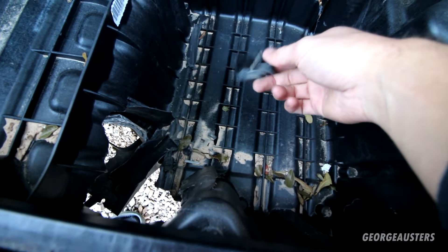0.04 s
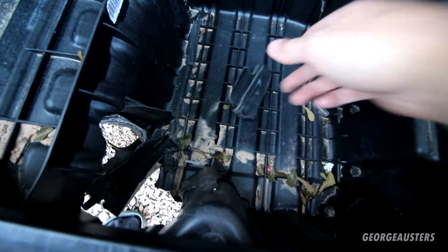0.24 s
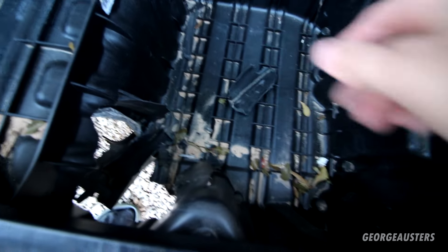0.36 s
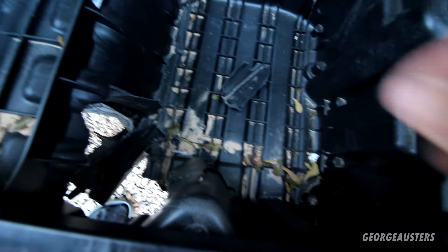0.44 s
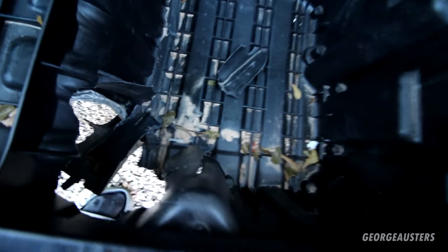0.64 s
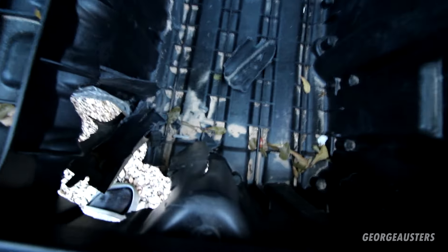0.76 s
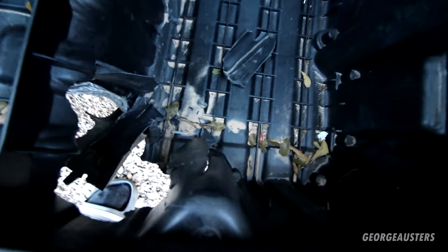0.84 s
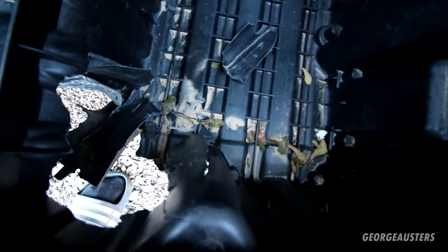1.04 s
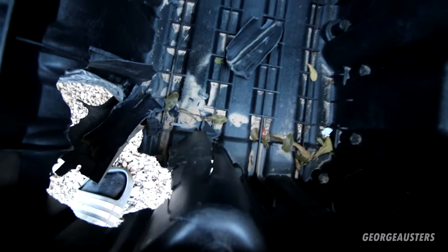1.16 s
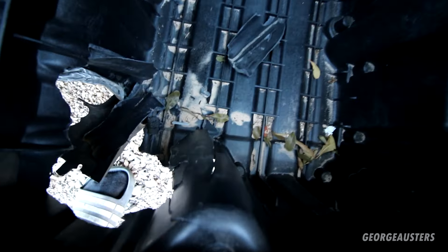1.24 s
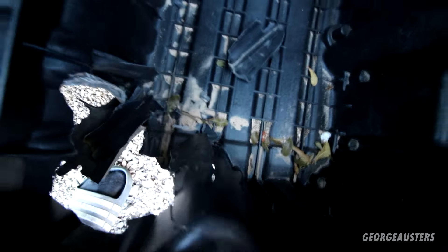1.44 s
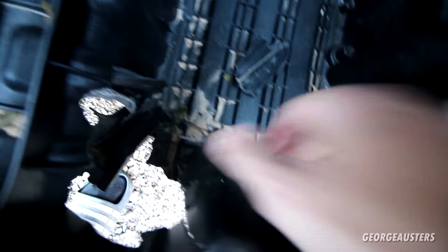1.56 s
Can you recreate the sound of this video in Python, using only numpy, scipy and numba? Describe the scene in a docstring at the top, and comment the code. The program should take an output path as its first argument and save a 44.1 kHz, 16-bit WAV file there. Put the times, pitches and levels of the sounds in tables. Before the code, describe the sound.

Close up, a broken plastic shard lands with a sharp hollow knock, bounces and rocks in a fast fading clatter, then lies still over quiet outdoor air and faint motor hum, before a soft rustling bump.

```python
"""A broken plastic piece is dropped on a ribbed plastic car boot floor, bounces and rocks to rest.
Each contact excites damped modes of the hollow floor panel; rattling noise bursts and modes clack the piece.
Finger friction whispers at resonances before the fall, and a sleeve rustles as level-shaped noise.
A far motor hums as a gliding sine over outdoor air of flickering noise bands.
Gain control at the close microphone ducks the background after loud hits; strong peaks are clipped."""
import sys
import numpy as np
from scipy import signal
from scipy.io import wavfile
from scipy.ndimage import uniform_filter1d
from numba import njit

SR = 44100
rng = np.random.default_rng(int(sys.argv[2]) if len(sys.argv) > 2 else 0)


def convert_level_to_amplitude(level_db):
    """Map a level in decibels to its linear amplitude factor."""
    exponent = np.asarray(level_db, float) / 20
    return 10 ** exponent


def materialize(psi):
    """Save the field psi as 16-bit PCM at rate SR to the path in sys.argv[1].

    A 1-D psi becomes a single channel; in a 2-D psi each row is a channel.
    """
    bounded = np.clip(np.atleast_2d(psi).T, -1, 1)
    quanta = np.round(bounded * 32767).astype(np.int16)
    wavfile.write(sys.argv[1], SR, quanta)


N = 70560  # samples, 1.6 s

# contacts on the floor panel; the piece lying on it shifts and damps the ring:
# (time [s], level [dB], main pitch [Hz], main t60 [s], low modes [dB], upper body [dB])
PANEL_CONTACTS = [(0.2293, 15, 414.5, 0.038, -8, -13.5), (0.254, -17, 414, 0.048, 9.5, -30),
                  (0.266, -10.5, 420, 0.095, -15, -24), (0.2875, -18, 434, 0.14, 5, -28),
                  (0.3342, -5.5, 407, 0.051, 0.5, -4.5), (0.353, 4.5, 416, 0.027, -33, -9.5),
                  (0.363, -4, 435.6, 0.051, -33, -16), (0.375, -10, 460, 0.065, 3.5, -13),
                  (0.398, -25, 394, 0.28, -10, -11), (0.418, -18.5, 420, 0.039, 0, -3),
                  (0.462, -10, 417, 0.065, -23, 1), (0.469, -10, 390, 0.041, -43, -7),
                  (0.479, 2, 444, 0.06, -1, -7), (0.518, -5, 445.7, 0.089, -6, -15),
                  (0.53, -6, 431, 0.041, -15, -4), (0.539, -13, 391, 0.062, -3, -35),
                  (0.56, -19, 450, 0.22, 9.5, -19), (0.5846, -4, 442, 0.043, -25, -6.5),
                  (0.596, -18, 460, 0.23, 12, -14), (0.603, -24, 430, 0.029, -19, -6),
                  (0.623, -4, 424.5, 0.078, -2.5, -9), (0.654, -13.5, 480, 0.083, 4, -7),
                  (0.668, -14.5, 422.6, 0.12, -24, -18), (0.683, -10.5, 424, 0.052, -4.5, -13),
                  (0.708, -29.5, 422, 0.094, 11, -12), (.728, -30.5, 420.5, 0.063, 10.5, -13),
                  (0.75, -38, 438, 0.059, -9, 5)]
# modes of the floor panel: (frequency [Hz], level [dB], t60 [s]);
# each contact scales the pitch and decay of the main group from MAIN_HZ and MAIN_T60_S
LOW_MODES = [(119, -12, 0.112), (169.7, -4, 0.071), (236, -13, 0.072), (257.6, -6, 0.078), (300, 4, 0.047)]
MAIN_MODES = [(364.5, 5, 0.026), (401.6, -3, 0.054), (433.7, 6.5, 0.089), (451, -15, 0.041)]
UPPER_MODES = [(640, 0.5, 0.013), (823, -7, 0.07), (942, 4, 0.027), (980, -9, 0.013), (1172, -8.5, 0.065),
               (1310, -31, 0.0083), (1570, -6, 0.0096), (1730, -2, 0.025)]
# first a low push that comes with the overloaded first hit, then thuds of the piece settling, then a hand:
# (time [s], level [dB], frequency [Hz], t60 [s])
PUSH_AND_THUDS = [(0.2299, 6.5, 58.5, 0.034), (.763, -21, 300, 0.1), (1.416, -15, 300, 0.018),
                  (1.425, -16.5, 270, 0.042), (1.448, -25, 419.5, 0.065), (1.495, -25, 237, 0.053),
                  (1.506, -24, 156, 0.14), (1.516, -28, 253, 0.076), (1.545, -30, 150, 0.071)]
# clacks of the loose piece: (time [s], level [dB], treble rattle change [dB], rattle t60 [s])
PIECE_CLACKS = [(0.2299, 5, -26, 0.0066), (0.3335, -14, 10.5, 0.065), (0.3515, 7.5, 6.5, 0.025),
                (0.3636, -1.5, 14.5, 0.046), (0.3762, -4, -25, 0.019), (0.42, -18.5, -28, 0.1),
                (0.4354, -48, -10, 0.079), (0.461, -11.5, -14, 0.071), (0.4635, -18.5, -18, 0.039),
                (0.4695, -19.5, -28, 0.071), (0.479, -15.5, -16, 0.036), (0.489, -0.5, 13, 0.022),
                (0.5, -15, -24, 0.0095), (0.5181, -18.5, -28, 0.048), (0.527, -22, -50, 0.056),
                (0.538, -37, -19, 0.032), (0.5835, -23, -32, 0.11), (0.5954, -43, -29, 0.27),
                (0.621, -28, -14, 0.12), (0.647, -27, -30, 0.11), (0.703, -37, -23, 0.041),
                (0.7508, -32.5, 6.5, 0.09), (0.954, -42.5, 0, .03)]
# modes of the piece: (frequency [Hz], level [dB], t60 [s])
PIECE_MODES = [(2084, -5, 0.033), (3100, 15, 0.012), (3230, 9, .018), (3653, 12.5, 0.011),
               (4446, 6.5, 0.017), (5330, 11.5, 0.027), (5870, -2.5, 0.031), (6930, 14, 0.0076),
               (7520, 6, 0.0057)]
# resonances of the slipping piece: (frequency [Hz], width [Hz], level [dB])
SLIP_RESONANCES = [(3070, 290, 2.5), (4850, 590, 6.5), (6630, 320, 6), (5650, 220, -9), (7660, 640, 0),
                   (10800, 3600, -7)]
# rustle of cloth and shifting: (time [s], then level [dB] in each of the four CLOTH_BANDS)
RUSTLE_LEVELS = [(0, -46, -51, -48, -59), (.13, -49.5, -51, -51, -55), (.2, -54, -49, -55, -64),
                 (.56, -34.5, -52, -45, -54), (.7, -46, -43.5, -42, -49.5), (.76, -42, -52, -47, -54),
                 (.8, -54, -49.5, -51, -61), (0.852, -42.5, -50, -44.5, -54),
                 (0.93, -58.5, -56.5, -63, -76), (1.04, -50, -57, -56, -70), (1.09, -42.5, -50, -43, -57),
                 (1.14, -45, -48, -44.5, -52), (1.22, -45, -60, -53.5, -59), (1.36, -47.5, -77, -61, -70),
                 (1.407, -41.5, -50, -43.5, -56), (1.431, -32, -34.5, -35, -39),
                 (1.462, -34, -32, -34.5, -36.5), (1.481, -36, -47, -40, -42),
                 (1.504, -44, -32.5, -35, -42.5), (1.55, -44, -56, -41.5, -46), (1.6, -45, -51, -41, -47)]
# bands of the rustle: (low edge [Hz], high edge [Hz])
CLOTH_BANDS = [(280, 1500), (1200, 2700), (2500, 5600), (5200, 14000)]
# course of the far motor: (time [s], frequency [Hz], level [dB])
MOTOR_HUM = [(0, 129, -55), (.2, 123.4, -54.5), (.92, 131.5, -47.5), (1.031, 130, -45.5),
             (1.15, 128.7, -40.5), (1.25, 134.8, -44.5), (1.4, 134.1, -50), (1.6, 130.4, -52)]
# relative spectral density of the outdoor air: (frequency [Hz], density [dB per Hz])
AIR_SPECTRUM = [(25, -51), (70, 2.5), (134, 4.5), (236, 6), (320, 1), (500, -1), (900, -5), (1550, -25),
                (2200, -40), (3800, -11), (8000, -16.5), (16000, -35)]

# panel
MAIN_HZ, MAIN_T60_S = 435, 0.07
RISE_S, RISE_GROWTH = 0.00092, 0.0011  # rise time constant, and its growth in s per s
SOFTEN_DB_PER_S, SOFT_HZ = 40.5, 836  # dB per octave above SOFT_HZ lost each second
CLATTER_DB, CLATTER_T60_S, PANEL_CUT_HZ = 1.5, 0.057, 81.6
STRIKE_SCATTER_DB, UPPER_SCATTER_DB, PIECE_SCATTER_DB = 1.5, 2.5, 3.5
PITCH_SCATTER = 0.012  # relative
# piece
CLACK_RISE_S, CLACK_TAIL_DB, CLACK_TAIL_T60_S = 0.0004, -13, 0.085
RING_DB, RATTLE_DB, RATTLE_TOP_DB, GRIT_DB = -17, -5.5, -15.5, 3
SLIP_S, SLIP_END_S, SLIP_DB = 0.11, 0.164, -51
# background
GRAINS_PER_S, GRAIN_SPREAD_DB, FLUTTER_DB = 250, 1.5, 2
AIR_DB = -43
# microphone
AGC_TOP_DB, AGC_SHARE, AGC_ATTACK_S, AGC_RELEASE_S = -22.5, 0.65, 0.0055, 0.045
CLIP, TOP_HZ = 0.92, 16300


def noise():
    """White noise: independent Gaussian samples."""
    return rng.standard_normal(N)


def band(x, lo_hz, hi_hz):
    """Band-pass filtering, normalised to unit standard deviation."""
    sos = signal.butter(2, [lo_hz, min(hi_hz, 0.45 * SR)], "bandpass", fs=SR, output="sos")
    y = signal.sosfilt(sos, x)
    return y / y.std()


def walk(rate):
    """Random fluctuation: values drawn at a rate [Hz], smoothed, with unit standard deviation."""
    k = int(SR / rate)
    held = np.repeat(rng.standard_normal(N // k + 1), k)
    y = uniform_filter1d(uniform_filter1d(held, k), k)[:N]
    return y / y.std()


def fade(t, t60):
    """Exponential damping: a fall of 60 dB in t60, held to at least 3 ms."""
    return np.exp(-np.log(1000) * t / max(t60, 0.003))


def rise(t, seconds):
    """Finite contact time: an exponential approach to 1."""
    return 1 - np.exp(-t / seconds)


def ring(t, modes, chance, scatter_db, pitch=1, damp=1):
    """Modal superposition: damped sines, with new strengths and slight detuning for each blow."""
    total = 0
    for (hz, db, t60), strength, detune in zip(modes, chance[0], chance[1]):
        mode_hz = hz * pitch * (1 + PITCH_SCATTER * detune)
        level = convert_level_to_amplitude(db + scatter_db * strength)
        total = total + level * fade(t, t60 * damp) * np.sin(2 * np.pi * mode_hz * t)
    return total


def add(out, at, x):
    """Superposition: mix a sound in at a time."""
    i = int(at * SR)
    out[i:i + len(x)] += x[:N - i]


def knocks():
    """Impact excitation of panel modes, softer and duller with time; dense upper modes blur to clatter."""
    out, t = np.zeros(N), np.arange(SR // 5) / SR
    chance = rng.standard_normal((len(PANEL_CONTACTS), 3, 2, 8))
    dull, bright = band(noise(), 680, 993), band(noise(), 846, 1520)
    for (at, db, hz, t60, low_db, up_db), c in zip(PANEL_CONTACTS, chance):
        age, i = at - PANEL_CONTACTS[0][0], int(at * SR)
        push = rise(t, RISE_S + RISE_GROWTH * age)
        tilt_db = -SOFTEN_DB_PER_S * age  # per octave
        main = ring(t, MAIN_MODES, c[0], STRIKE_SCATTER_DB, hz / MAIN_HZ, t60 / MAIN_T60_S)
        low = convert_level_to_amplitude(low_db) * ring(t, LOW_MODES, c[1], STRIKE_SCATTER_DB)
        softened = [(f, d + tilt_db * max(np.log2(f / SOFT_HZ), 0), s) for f, d, s in UPPER_MODES]
        upper = rise(t, 0.00028) * ring(t, softened, c[2], UPPER_SCATTER_DB)
        blur = (dull + convert_level_to_amplitude(tilt_db / 2) * bright)[i:i + len(t)]
        clatter = convert_level_to_amplitude(CLATTER_DB) * push * fade(t, CLATTER_T60_S) * blur
        add(out, at, -convert_level_to_amplitude(db) * (push ** 2 * (main + low) + convert_level_to_amplitude(up_db) * (clatter + upper)))
    return signal.sosfilt(signal.butter(4, PANEL_CUT_HZ, "highpass", fs=SR, output="sos"), out)


def push_and_thuds():
    """Single-mode response: the low push and each thud are one damped sine with a short rise."""
    out, t = np.zeros(N), np.arange(SR // 5) / SR
    for at, db, hz, t60 in PUSH_AND_THUDS:
        add(out, at, convert_level_to_amplitude(db) * fade(t, t60) * rise(t, 0.00077) * np.sin(2 * np.pi * hz * t))
    return out


def clacks():
    """Modal ringing with rattle: gritty noise bursts, the middle band with a weaker tail."""
    out, t = np.zeros(N), np.arange(SR // 6) / SR
    chance = rng.standard_normal((len(PIECE_CLACKS), 2, 16))
    grit = convert_level_to_amplitude(GRIT_DB * walk(600))
    mid, top = band(noise(), 1110, 4030) * grit, band(noise(), 3900, 8700) * grit
    for (at, db, top_db, t60), c in zip(PIECE_CLACKS, chance):
        i = int(at * SR)
        decay = fade(t, t60) + convert_level_to_amplitude(CLACK_TAIL_DB) * fade(t, CLACK_TAIL_T60_S)
        rattle = convert_level_to_amplitude(RATTLE_DB) * decay * mid[i:i + len(t)]
        treble = convert_level_to_amplitude(RATTLE_TOP_DB + top_db) * fade(t, 0.77 * t60) * top[i:i + len(t)]
        modes = convert_level_to_amplitude(RING_DB) * ring(t, PIECE_MODES, c, PIECE_SCATTER_DB)
        add(out, at, convert_level_to_amplitude(db) * rise(t, CLACK_RISE_S) * (rattle + treble + modes))
    return out


def slip(t):
    """Friction excitation: the piece slips off the fingers, whispering in bands at its resonances."""
    envelope = np.clip((t - SLIP_S) / 0.014, 0, 1) * np.clip((SLIP_END_S - t) / 0.024, 0, 1)
    whisper = sum(convert_level_to_amplitude(db) * band(noise(), hz - width / 2, hz + width / 2)
                  for hz, width, db in SLIP_RESONANCES)
    return convert_level_to_amplitude(SLIP_DB + 2.3 * walk(81.5)) * envelope * whisper


def rustle(t):
    """Cloth friction: noise with sparse stronger grains, in four bands with their own level curves."""
    struck = rng.random(N) < GRAINS_PER_S / SR
    grains = struck * convert_level_to_amplitude(GRAIN_SPREAD_DB * rng.exponential(size=N)) + 5.4  # over a steady bed
    times, *levels = np.array(RUSTLE_LEVELS).T
    flutter_db = FLUTTER_DB * walk(150)
    return sum(band(grains * noise(), lo, hi) * convert_level_to_amplitude(np.interp(t, times, db) + flutter_db)
               for (lo, hi), db in zip(CLOTH_BANDS, levels))


def hum(t):
    """Phase integration: a sine of gliding frequency and wavering level for the far motor."""
    times, hz, db = np.array(MOTOR_HUM).T
    phase = 2 * np.pi * np.cumsum(np.interp(t, times, hz)) / SR
    level = convert_level_to_amplitude(np.interp(t, times, db) + 1.1 * walk(15.5)) * np.sqrt(2)  # rms to peak
    return np.sin(phase) * level


def air():
    """Spectral synthesis: outdoor noise in flickering bands spaced half an octave apart."""
    out = 0
    hz_points, density_db = np.array(AIR_SPECTRUM).T
    for hz in 30 * 2 ** np.arange(0, 9.2, 0.5):
        db = np.interp(np.log(hz), np.log(hz_points), density_db)
        db = db + 10 * np.log10(hz) + 0.74 * walk(8.74)  # bandwidth grows with frequency
        out = out + convert_level_to_amplitude(db) * band(noise(), hz / 2 ** 0.19, hz * 2 ** 0.23)
    return out / out.std() * convert_level_to_amplitude(AIR_DB)


def scene():
    """Linear superposition of all sources at one microphone."""
    t = np.arange(N) / SR
    return (knocks() + push_and_thuds() + clacks() + slip(t) + rustle(t) + hum(t) + air())[None]


@njit
def follow(x, up, down):
    """Envelope detection: one-pole smoothing, quick up and slow down."""
    e, y = 1e-9, np.empty(len(x))
    for i in range(len(x)):
        e += (x[i] - e) * (up if x[i] > e else down)
        y[i] = e
    return y


def low_pass(x):
    """Removes everything above the highest recorded frequency."""
    return signal.sosfilt(signal.butter(12, 16820, fs=SR, output="sos"), x)


def record(dry):
    """Dynamic compression: gain falls as the level passes a threshold; then hard clipping and treble cut."""
    level = follow(np.abs(dry[0]), 1 / (AGC_ATTACK_S * SR), 1 / (AGC_RELEASE_S * SR))
    gain = np.minimum(1, (convert_level_to_amplitude(AGC_TOP_DB) / level) ** AGC_SHARE)
    clipped = np.clip(dry * gain, -CLIP, CLIP)
    mix = signal.sosfilt(signal.butter(8, TOP_HZ, fs=SR, output="sos"), clipped)
    return low_pass(mix)


dry = scene()
out = record(dry)
materialize(out)
```